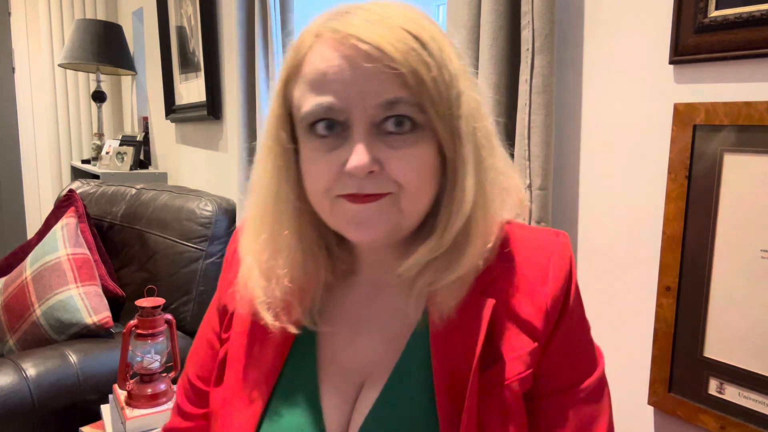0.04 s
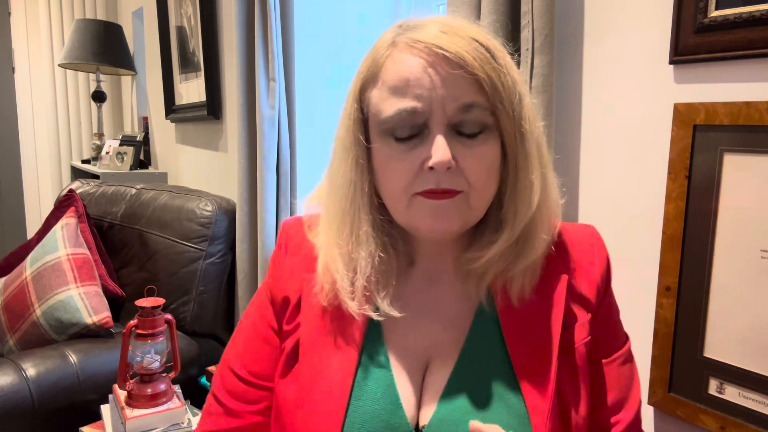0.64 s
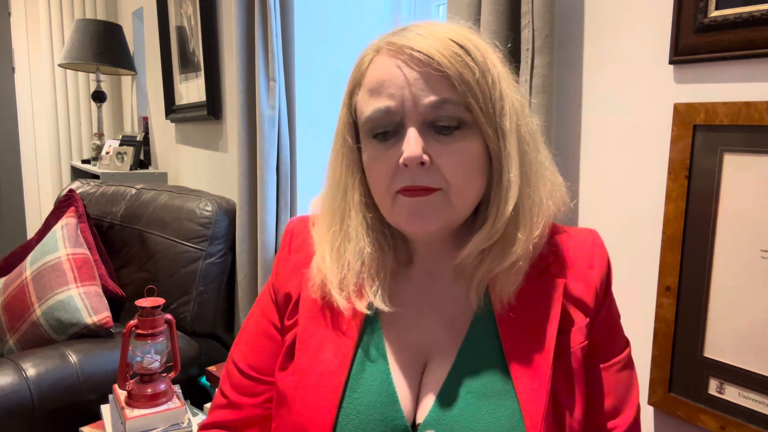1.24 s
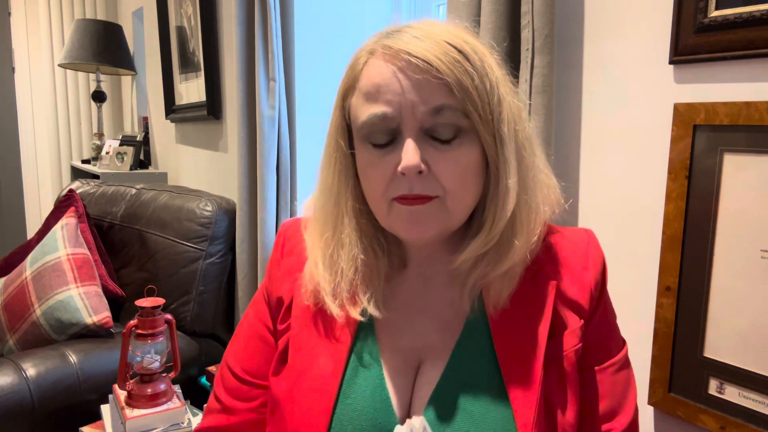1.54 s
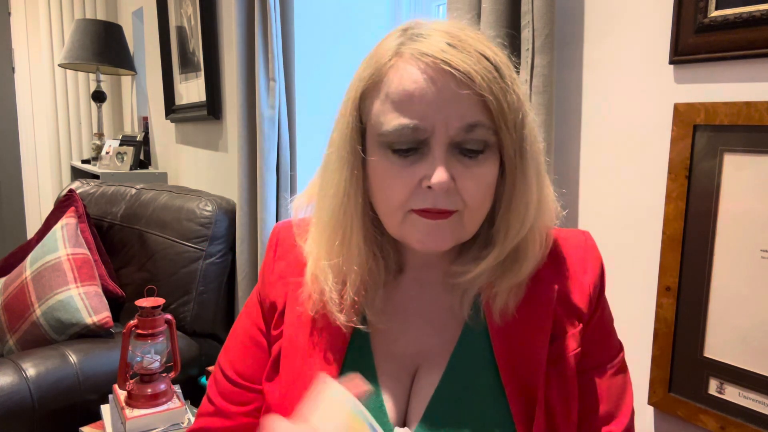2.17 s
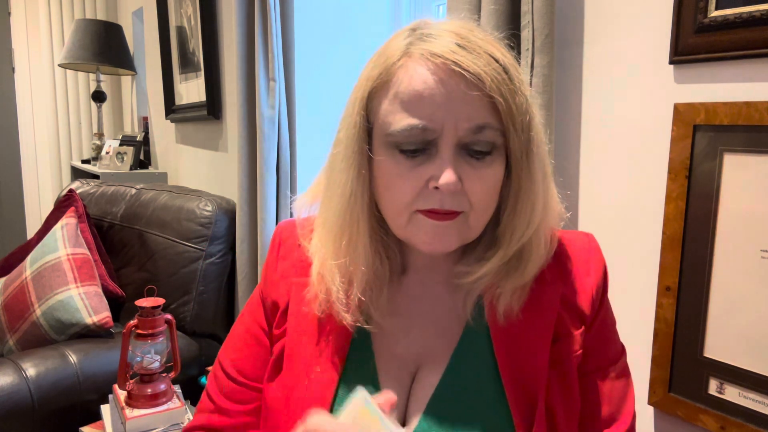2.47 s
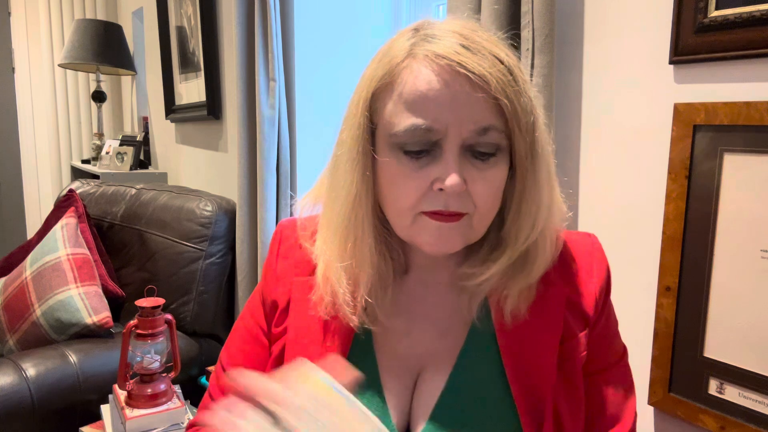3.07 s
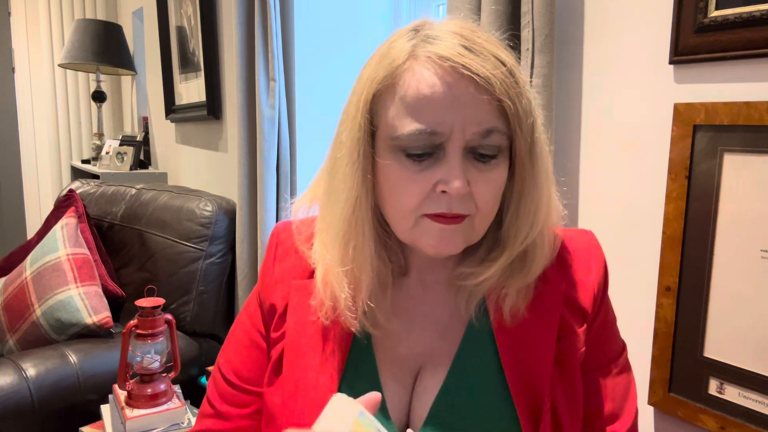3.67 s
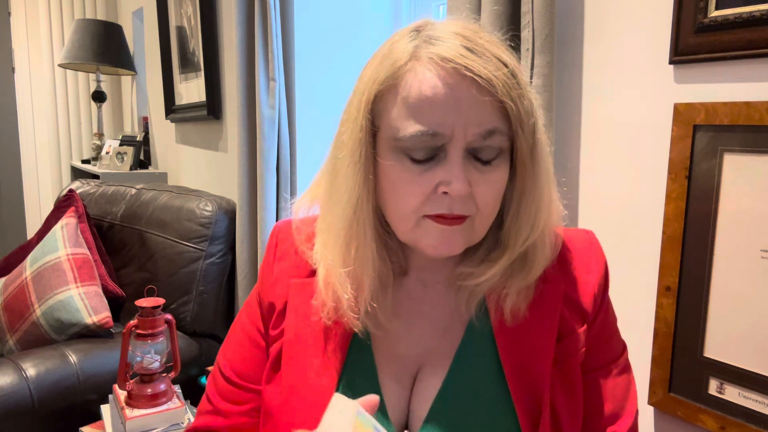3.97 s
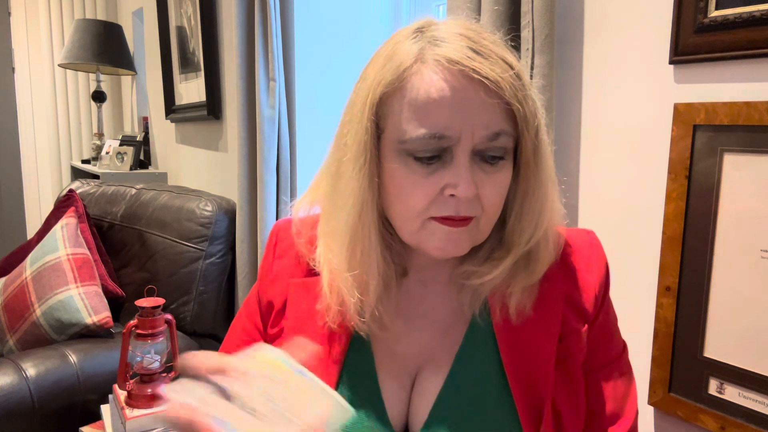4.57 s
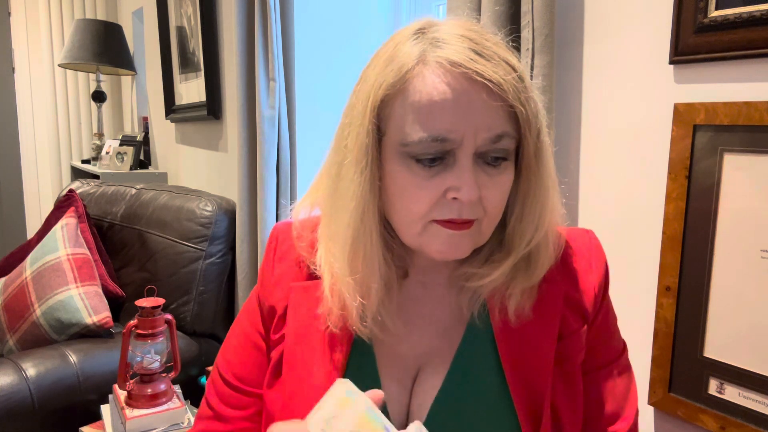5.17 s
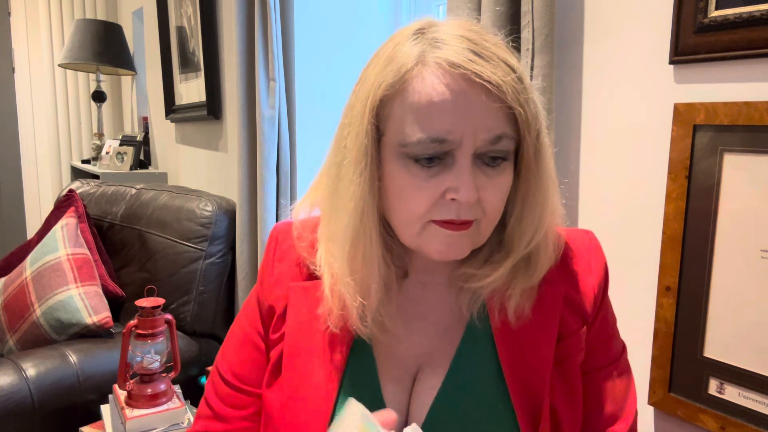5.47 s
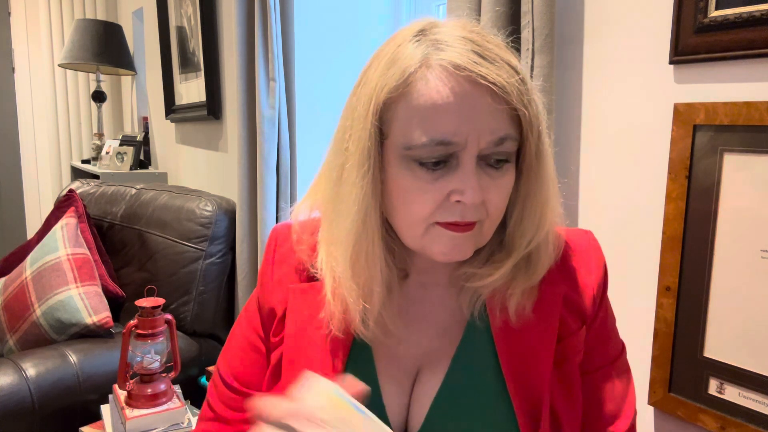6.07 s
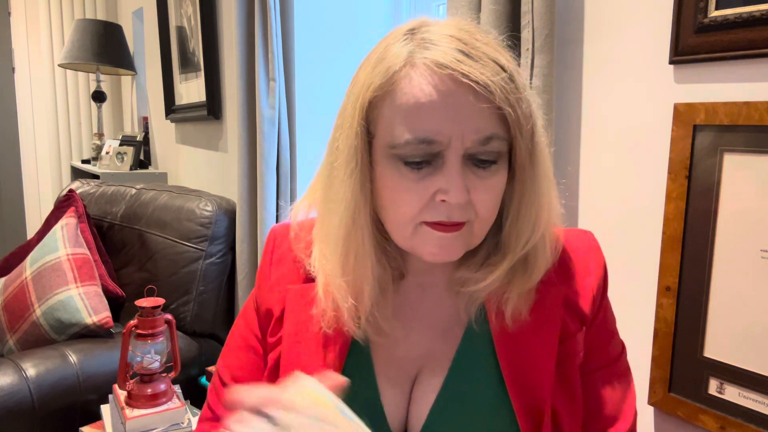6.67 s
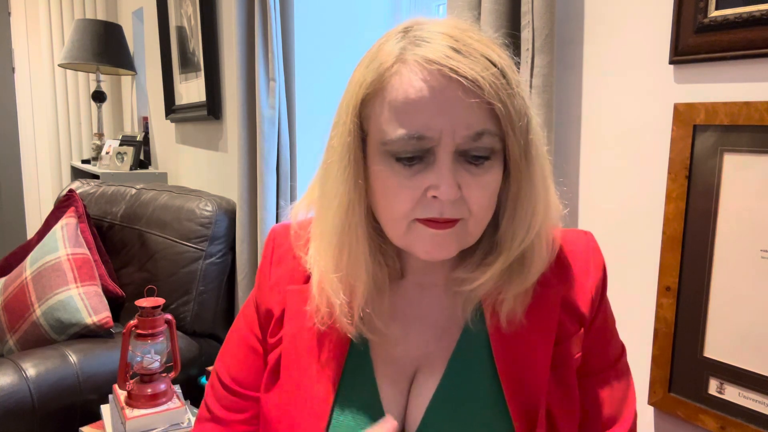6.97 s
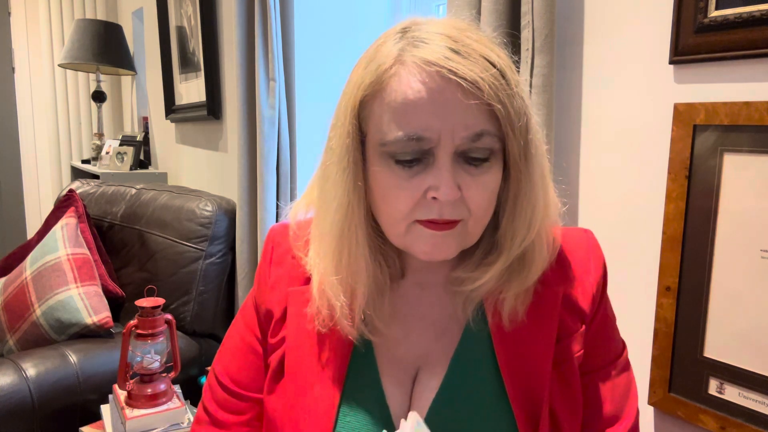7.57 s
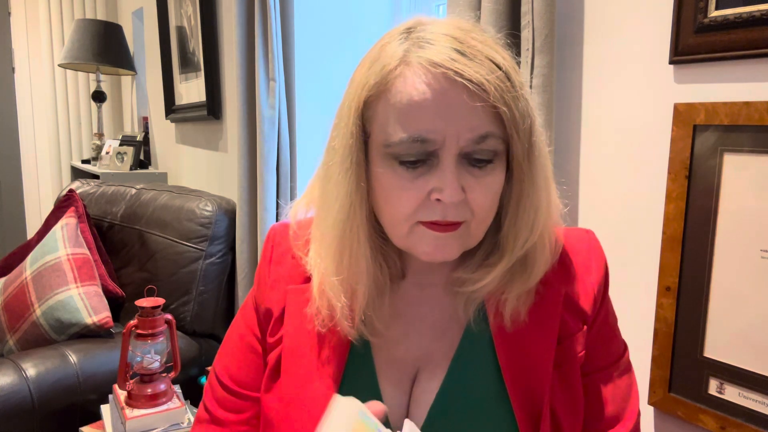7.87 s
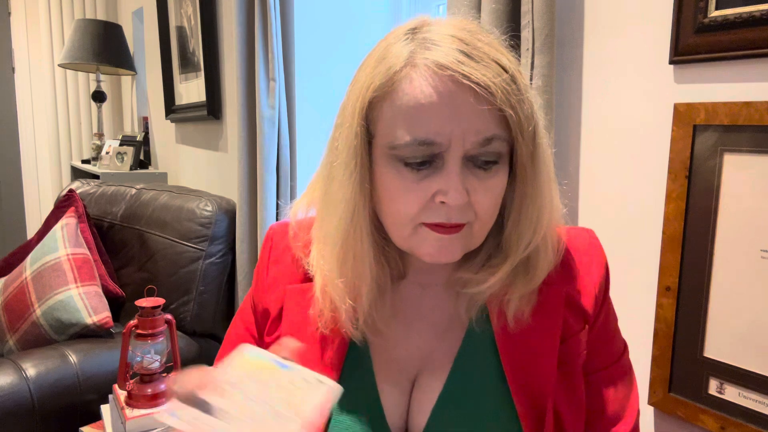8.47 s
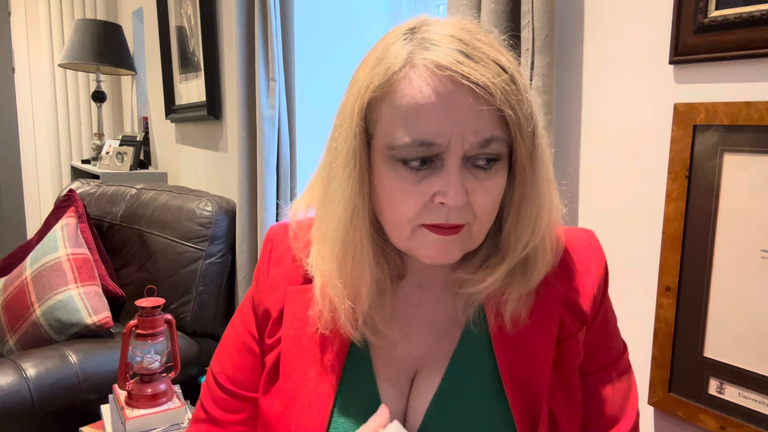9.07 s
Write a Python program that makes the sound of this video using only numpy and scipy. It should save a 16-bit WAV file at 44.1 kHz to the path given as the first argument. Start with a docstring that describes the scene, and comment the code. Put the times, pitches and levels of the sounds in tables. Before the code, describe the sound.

One sharp knock of cards on a tabletop, followed by close, unhurried hand shuffling: cards slide, flick and land with crisp, irregular snaps.

```python
"""One sharp knock of a tarot deck on a table, then a slow hand shuffle in a quiet room.
Packets swish out as card rubs on card, and drop back with a snap as their edges land one after another.
Each flick, landing and new grip thuds softly in the hand-held deck; between cuts, single cards slide.
A microphone pair close to the hands hears it all, with the room's echo, faint hiss and hum behind."""
import sys
import numpy as np
from scipy import signal
from scipy.fft import rfft, irfft, next_fast_len
from scipy.io import wavfile
from scipy.ndimage import uniform_filter1d

SR = 44100
rng = np.random.default_rng(int(sys.argv[2]) if len(sys.argv) > 2 else 0)


def generate_wav(signal):
    """Clip the signal to [-1, 1] and save it as 16-bit WAV at the path in sys.argv[1]."""
    frames = np.transpose(np.atleast_2d(signal))
    scaled = np.clip(frames, -1, 1) * 32767
    pcm = np.round(scaled).astype(np.int16)
    wavfile.write(sys.argv[1], SR, pcm)


N = 411464

# A card's edge flicks off the thumb or its neighbour, close to the microphones: start_s, level_db
CARD_FLICKS = [(0.617, -48), (0.996, -56.5), (1.13, -52), (1.171, -47.5), (2.473, -44.5), (2.488, -42),
               (2.521, -41.5), (2.799, -49), (2.901, -52), (4.227, -62), (4.331, -46.5), (4.351, -48.5),
               (4.364, -42), (4.667, -40), (5.289, -52.5), (5.714, -53.5), (6.478, -48), (6.611, -41),
               (6.622, -46.5), (8.083, -55), (8.323, -55), (8.335, -43), (8.347, -42.5), (8.911, -64.5)]
# A packet lands on the deck in the hand: start_s, pitch_hz, clack_db, edges_db, thud_db
PACKET_LANDINGS = [(0.628, 1260, -47.5, -49, -50.5), (2.527, 2210, -42.5, -46.5, -41),
                   (2.58, 1180, -49.5, -55, -47.5), (2.832, 1510, -52.5, -50.5, -49),
                   (2.934, 710, -48.5, -57.5, -40.5), (3.175, 1490, -48.5, -49, -54),
                   (3.421, 955, -62, -69, -68.5), (4.445, 920, -55.5, -56.5, -44.5),
                   (4.698, 1900, -38.5, -40, -40), (5.937, 1390, -35.5, -47.5, -44.5),
                   (5.961, 1930, -44.5, -53, -42), (6.466, 1080, -50, -50.5, -62),
                   (6.514, 1210, -47.5, -45.5, -50.5), (6.915, 1970, -46, -45, -47),
                   (6.941, 2080, -52.5, -48, -51), (8.353, 2500, -38, -40, -51),
                   (8.392, 520, -41.5, -41, -29.5), (8.42, 1030, -40, -49, -41),
                   (8.64, 1530, -53, -56, -47), (8.677, 2110, -50, -49.5, -48.5)]
# The band of the clack around its pitch: pitch_ratio, density_db
CLACK_SPECTRUM = [(.1, -20), (.45, -12), (.75, -5.5), (1, -1.5), (1.3, -6.5), (1.9, -15), (5, -44)]
# The bright snap of the edges: frequency_hz, density_db
SNAP_SPECTRUM = [(900, -38), (1600, -18.5), (2200, -0.5), (3000, -4), (4200, -6), (5500, -14),
                 (10000, -20.5)]
# The hiss of the edges, heard from close by: frequency_hz, density_db
HISS_SPECTRUM = [(2000, -27.5), (3800, -7.5), (4800, 0.5), (6200, -1), (8200, 4), (10000, -2.5),
                 (12300, -4), (14500, 3), (16000, -2)]
def card_snaps(flick_rise_s=.003, flick_hz=1363, landing_rise_s=0.0023, usual_db=-48, linger=0.14):
    """Card edges strike one after another: a burst of grains that swells, dies and lingers a little."""
    contacts = [(s, flick_rise_s, flick_hz, db - 8, db - 6.5, db) for s, db in CARD_FLICKS]
    for start_s, pitch_hz, clack_db, edges_db, _ in PACKET_LANDINGS:
        rise_s = landing_rise_s * amp(0.53 * (usual_db - clack_db))  # a harder landing peaks sooner
        contacts.append((start_s, rise_s, pitch_hz, clack_db, edges_db - 1, edges_db - 1))
    out, t = np.zeros((2, N)), np.arange(SR // 8) / SR
    fibres = paper_grains(per_s=22000, spread_db=1.0, width=0.63)
    for start_s, rise_s, pitch_hz, clack_db, snap_db, hiss_db in contacts:
        age = t / rise_s
        envelope = age * np.exp(-age) + linger * np.exp(-age / 4)
        clack = [(ratio * pitch_hz, db) for ratio, db in CLACK_SPECTRUM]
        layers = [(clack, clack_db), (SNAP_SPECTRUM, snap_db), (HISS_SPECTRUM, hiss_db)]
        for (spectrum, level_db), offset in zip(layers, rng.integers(0, N - len(t), size=3)):
            burst = colour(fibres[:, offset:offset + len(t)] * envelope, spectrum, size=1024)
            rms_10_ms = np.sqrt(np.sum(burst ** 2) / 2 / (SR / 100))  # as if all its energy fell in 10 ms
            add(out, start_s, amp(level_db) * burst / rms_10_ms)
    return out


# A cut, one packet dragged across the deck: start_s, end_s, level_db
PACKET_CUTS = [(2.45, 2.618, -57.5), (2.785, 2.969, -58.5), (3.137, 3.262, -63.5), (4.32, 4.452, -56),
               (4.654, 4.771, -57.5), (5.982, 6.108, -58.5), (6.455, 6.565, -61), (6.57, 6.675, -55),
               (6.896, 7.064, -64.5), (8.31, 8.442, -52), (8.629, 8.745, -60.5)]
# A single card eased along the deck between cuts: start_s, end_s, level_db
CARD_SLIDES = [(0.07, 0.2, -72), (0.647, 0.711, -67), (0.884, 1.09, -64), (1.096, 1.414, -65.5),
               (1.415, 1.739, -72), (1.735, 1.866, -63), (1.859, 1.947, -71), (1.944, 2.246, -66),
               (3.4, 3.717, -67), (3.746, 3.915, -58.5), (4.012, 4.125, -56), (4.907, 5.006, -68.5),
               (5.024, 5.225, -63.5), (5.22, 5.261, -46.5), (5.236, 5.379, -62), (5.442, 5.575, -63.5),
               (5.565, 5.728, -62), (7.165, 7.443, -61), (7.522, 7.634, -70), (7.743, 7.887, -71.5),
               (7.904, 8.136, -64), (9.041, 9.14, -70), (9.23, 9.339, -59)]
# The scrape of face on face: frequency_hz, density_db
SCRAPE_SPECTRUM = [(150, -5.5), (500, -14), (1000, -5.5), (1700, -5.5), (2800, 0.5), (4300, -2),
                   (7000, -15), (14000, -32)]
def card_swishes(judder_db=3.28, catch_db=-14.0, usual_hiss_db=-62, usual_scrape_db=-69.5):
    """Card rubs on card and now and then catches; each stroke speeds up and slows as pressure wavers."""
    # Pressed together in a cut, the faces scrape about as loudly as the edges hiss.
    strokes = [(start_s, end_s, db - 2, db) for start_s, end_s, db in PACKET_CUTS]
    for start_s, end_s, hiss_db in CARD_SLIDES:  # a faster slide gains more hiss than scrape
        scrape_db = usual_scrape_db + 0.36 * (hiss_db - usual_hiss_db)
        strokes.append((start_s, end_s, scrape_db, hiss_db))
    out = np.zeros((2, N))
    for layer, spectrum in enumerate([SCRAPE_SPECTRUM, HISS_SPECTRUM]):
        envelope = np.zeros(N)
        for start_s, end_s, *levels_db in strokes:
            speed = np.sin(np.linspace(0, np.pi, round((end_s - start_s) * SR)))
            add(envelope, start_s, amp(levels_db[layer]) * abs(speed) ** 0.72)
        judder = unit_rms(uniform_filter1d(rng.standard_normal(N), size=1100))
        fine_grain = paper_grains(per_s=20000, spread_db=3.0, width=0.36)
        catches = amp(catch_db) * paper_grains(per_s=70, spread_db=3.0, width=0.36)
        out += colour((fine_grain + catches) * envelope * amp(judder_db * judder), spectrum)
    return out


def paper_grains(per_s, spread_db, width):
    """Paper fibres catch and let go: tiny uneven clicks, partly unlike at the two microphones."""
    strength = amp(spread_db * np.minimum(rng.exponential(1, N), 4))
    clicks = strength * (rng.random(N) < per_s / SR)
    mid, side = rng.standard_normal((2, N)) * clicks
    return unit_rms(np.array([mid + width * side, mid - width * side]))


def hand_reflection(x, echo_gain=0.41, usual_delay_s=.0005, travel=0.83):
    """A reflection off the moving hand: its changing delay sweeps the colour of the rubbing."""
    n = np.arange(N)
    drift = uniform_filter1d(rng.standard_normal(N), size=6000)
    hand_position = unit_rms(uniform_filter1d(drift, size=6000))
    delay_samples = usual_delay_s * SR * np.exp(travel * hand_position)
    echo = np.array([np.interp(n - delay_samples, n, channel) for channel in x])
    return (x + echo_gain * echo) / np.hypot(1, echo_gain)


# The deck meets the table, close by and slightly left: start_s, level_db
KNOCK_CONTACTS = [(0.4052, -14), (0.4067, -22), (0.4125, -29.5)]
# The ring of the table top: pitch_hz, level_db, t60_s
TABLE_MODES = [(225, -17, 0.085), (430, -13, 0.065), (1026, -3, 0.021), (1265, -3.5, 0.01),
               (1400, -5.5, 0.016), (1920, -9.5, 0.0092), (2463, -4, .016), (3080, -3, 0.013),
               (3320, 1, 0.011), (4380, -0.5, 0.0061), (4730, -3, 0.011), (6340, -5, 0.0088),
               (8000, -7.5, .006)]
def table_knock(crack_db=9.5, crack_s=0.00041, crack_band_hz=(1100, 9000), pan_db=1.0):
    """The deck lands on one corner, then on its edge, and settles: a crack and the ring of the table."""
    out, t = np.zeros((2, N)), np.arange(SR // 3) / SR
    band = signal.butter(1, crack_band_hz, "band", fs=SR, output="sos")
    envelope = amp(crack_db) * np.sqrt(t / crack_s) * np.exp(-t / crack_s)
    for start_s, level_db in KNOCK_CONTACTS:
        crack = signal.sosfilt(band, envelope * rng.standard_normal((2, len(t))))
        add(out, start_s, amp(level_db) * (ring(TABLE_MODES, corner_hz=12000) + crack))
    return low_cut(out, hz=160) * amp([[pan_db], [-pan_db]])


# The fingers take a new grip on the deck: start_s, level_db
FINGER_GRIPS = [(0.882, -50), (1.139, -51), (2.863, -43.5), (4.077, -52.5), (4.34, -37), (6.093, -46.5),
                (6.532, -44.5), (6.612, -43), (8.199, -56), (8.245, -53)]
# The ring of the deck held in the hand: pitch_hz, level_db, t60_s
DECK_MODES = [(72.5, 0, 0.14), (97, -7, 0.078), (136, -2.5, 0.14), (176.6, -7.5, 0.034), (248, -2.5, .08),
              (328, -3, 0.059), (453, -3.5, 0.076), (691.2, -6.5, 0.043), (743, -4.5, 0.23),
              (920, -15, .025), (1190, -16.5, .025)]
def deck_thuds(finger_corner_hz=200, packet_corner_hz=330, knock_corner_hz=510, grip_detune=.09):
    """Each soft blow pushes the deck and the hand holding it; the changing grip shifts the upper modes."""
    blows = [(start_s, db - 5, finger_corner_hz) for start_s, db in CARD_FLICKS]
    blows += [(start_s, db, finger_corner_hz) for start_s, db in FINGER_GRIPS]
    for start_s, pitch_hz, _, _, thud_db in PACKET_LANDINGS:
        hardness = (1180 / pitch_hz) ** 0.21  # a thicker packet clacks lower and strikes harder
        blows.append((start_s, thud_db, packet_corner_hz * hardness))
    settle_s = KNOCK_CONTACTS[-1][0]
    blows.append((settle_s, -37.5, knock_corner_hz))  # the hands follow through after the knock
    out = np.zeros((2, N))
    for start_s, level_db, corner_hz in blows:
        shifts = 1 + grip_detune * rng.uniform(-1.1, 1, len(DECK_MODES))
        modes = [(hz * shift if hz > 200 else hz, db, t60_s)
                 for (hz, db, t60_s), shift in zip(DECK_MODES, shifts)]
        add(out, start_s, amp(level_db) * ring(modes, corner_hz))
    return low_cut(out, hz=55)


def ring(modes, corner_hz):
    """Dying sines of a struck body; a soft blow builds up slowly and weakens those above its corner."""
    t = np.arange(SR // 3) / SR
    sines = np.zeros(len(t))
    for k, (hz, level_db, t60_s) in enumerate(modes):
        drive = (-1) ** k / np.hypot(1, (hz / corner_hz) ** 2)
        sines += drive * amp(level_db - 60 * t / t60_s) * np.sin(2 * np.pi * hz * t)
    return sines * (1 - np.exp(-2 * corner_hz * t))


# How long the room rings around the table: frequency_hz, t60_s
ROOM_DECAY = [(100, 0.77), (400, 0.46), (1200, 0.44), (3200, 0.45), (7000, 0.42), (14000, 0.25)]
# The colour of the echo coming back to the microphones: frequency_hz, level_db
ECHO_SPECTRUM = [(60, -9.5), (200, 4.5), (1200, -1), (3200, -5.5), (7000, -4.5), (14000, -5.5)]
def room_echo(x, early_db=13.0, early_s=0.02, gap_s=.003):
    """Sparse echoes: strong early ones from the table and near walls, then a tail dying band by band."""
    t = np.arange(SR * 2 // 3) / SR
    signs = rng.choice([-1., 1.], (2, len(t)))
    echoes = signs * (rng.random((2, len(t))) < 0.1) * (t > gap_s)
    echoes *= 1 + amp(early_db) * np.exp(-t / early_s)
    hz, age_s, bands = signal.stft(echoes, SR, nperseg=256)
    decay_db = 60 * age_s / curve_at(ROOM_DECAY, hz)[:, None]
    bands *= amp(curve_at(ECHO_SPECTRUM, hz)[:, None] - decay_db)
    response = signal.istft(bands, SR)[1]
    return signal.oaconvolve(x, response / np.linalg.norm(response[0]), axes=1)[:, :N]


# A low hum far behind the cards: pitch_hz, level_db
HUM_TONES = [(47, -76.5), (78, -76.5), (133, -86.5)]
# Rumble and hiss all around the microphones: frequency_hz, density_db
AIR_SPECTRUM = [(20, -25), (45, -4.5), (80, 2), (120, -7), (200, -12), (400, -21.5), (1000, -23),
                (2000, -27), (4000, -32), (8000, -34.5), (14000, -38)]
def room_tone(air_db=-69.5, waver_rad=0.35):
    """The still room: faint hiss, rumble and a low wavering hum."""
    t = np.arange(N) / SR
    drifts = unit_rms(uniform_filter1d(rng.standard_normal((len(HUM_TONES), N)), size=6000, axis=1))
    hum = sum(amp(db) * np.sqrt(2) * np.sin(2 * np.pi * hz * t + waver_rad * drift)
              for (hz, db), drift in zip(HUM_TONES, drifts))
    air = unit_rms(colour(rng.standard_normal((2, N)), AIR_SPECTRUM))
    return amp(air_db) * air + hum


def amp(db):
    """Decibels to gain."""
    return 10 ** (np.asarray(db) / 20)


def unit_rms(x):
    """Scales to rms 1."""
    return x / np.sqrt(np.mean(x ** 2) + 1e-20)


def curve_at(points, hz):
    """Reads a curve on a log-frequency axis."""
    point_hz, values = np.transpose(points)
    return np.interp(np.log(hz + 1), np.log(point_hz + 1), values)


def add(mix, start_s, sound):
    """Mixes a sound in at start_s."""
    part = mix[..., round(start_s * SR):][..., :sound.shape[-1]]
    part += sound[..., :part.shape[-1]]


def colour(x, spectrum, size=4096):
    """Applies a minimum-phase filter of unit energy with the given spectrum."""
    hz = abs(np.fft.fftfreq(size, 1 / SR))
    log_gain = np.log(amp(curve_at(spectrum, hz)))
    response = np.exp(np.conj(signal.hilbert(log_gain)))
    taps = np.fft.ifft(response).real[:size // 2]
    return signal.oaconvolve(x, taps[None] / np.linalg.norm(taps), axes=1)[:, :N]


def low_cut(x, hz):
    """High-pass: the deepest bass is taken away."""
    return signal.sosfilt(signal.butter(2, hz, "high", fs=SR, output="sos"), x)


def scene(sharp_echo_db=-3.5, soft_echo_db=-5.5):
    """Everything happens at the hands, close to the microphones, and spills into the room."""
    sharp = card_snaps() + table_knock()
    soft = deck_thuds() + hand_reflection(card_swishes())
    spill = amp(sharp_echo_db) * sharp + amp(soft_echo_db) * soft
    return sharp + soft + room_echo(spill) + room_tone()


# How far the left microphone leads the right: frequency_hz, lead_rad
MIC_PHASE = [(100, 0), (300, -.4), (600, -1), (1100, .7), (2200, 1.1), (3600, 1.4), (5700, 2), (7500, 0),
             (9400, -.6), (10100, -2.9), (11300, -3), (12100, -.6), (15000, -.5)]
# Gain on the difference between the two microphones: frequency_hz, side_db
MIC_WIDTH = [(70, -13), (200, -4), (500, 2), (5000, 1), (8000, -3), (9500, -4), (10200, -16), (11300, -16),
             (12100, -3), (15000, -2)]
def record(dry, top_hz=15850):
    """The close pair hears the bass nearly alike, the treble out of step, and nothing above top_hz."""
    size = next_fast_len(N + SR // 10)
    hz = np.fft.rfftfreq(size, 1 / SR)
    left, right = rfft(dry, size)
    mid = (left + right) / 2
    side = (left - right) / 2 * amp(curve_at(MIC_WIDTH, hz))
    half_lead = np.exp(.5j * curve_at(MIC_PHASE, hz))
    pair = irfft(np.array([(mid + side) * half_lead, (mid - side) / half_lead]), size)[:, :N]
    low_pass = signal.firwin(511, top_hz, window=("kaiser", 9), fs=SR)
    return signal.oaconvolve(pair, low_pass[None], "same")


dry = scene()
out = record(dry)
generate_wav(out)
```